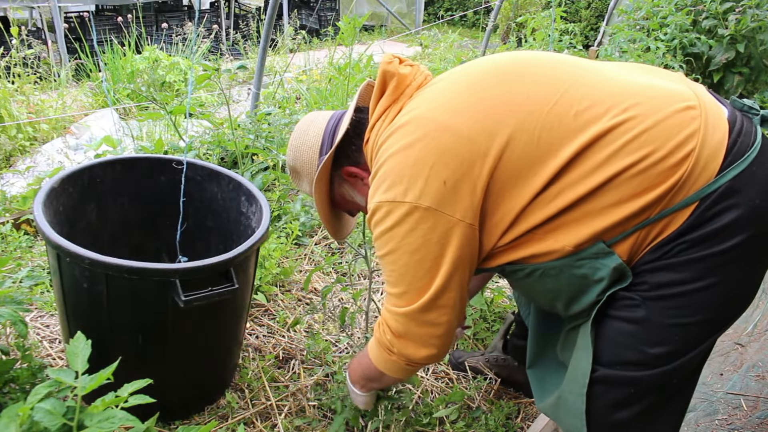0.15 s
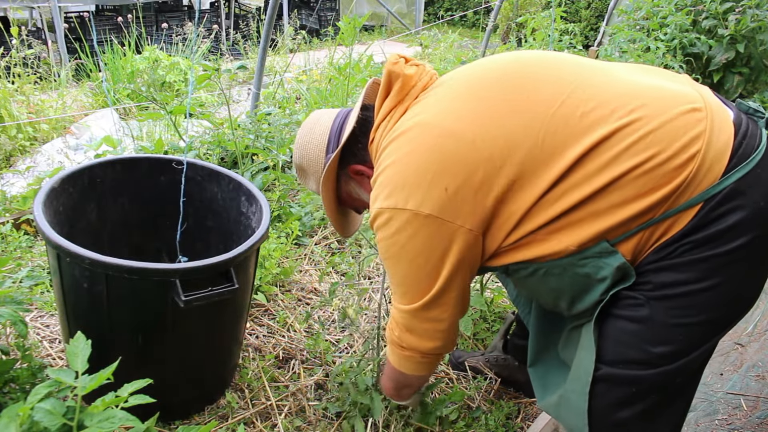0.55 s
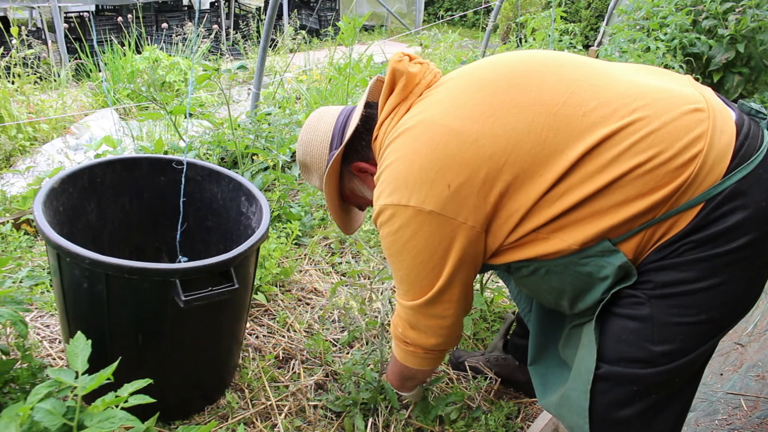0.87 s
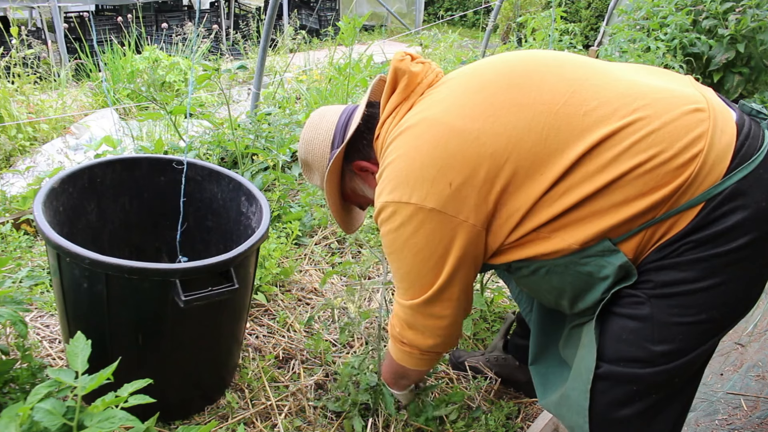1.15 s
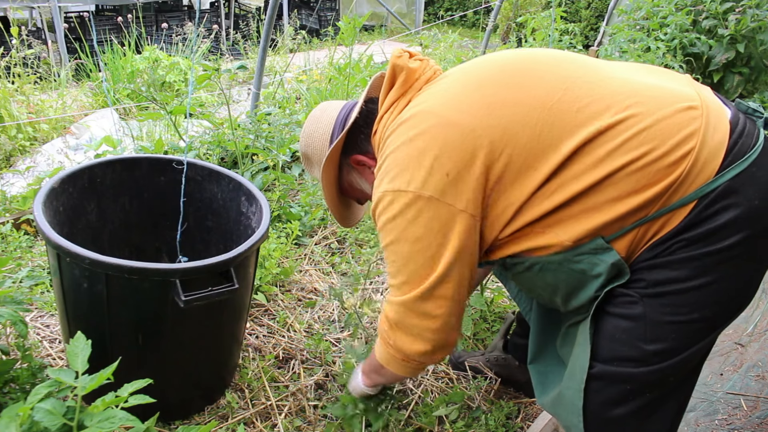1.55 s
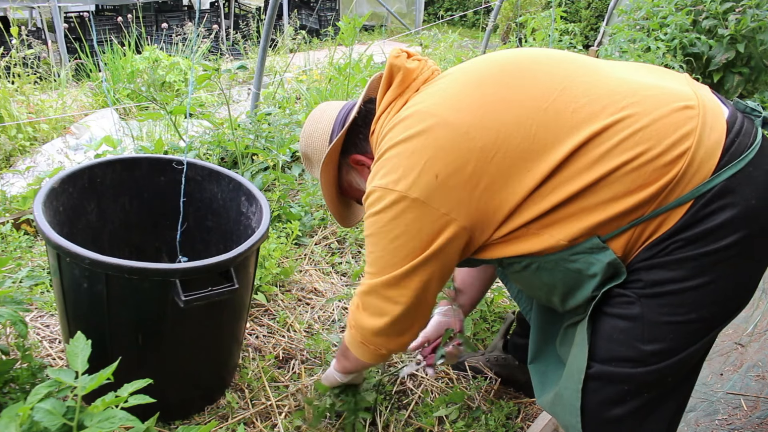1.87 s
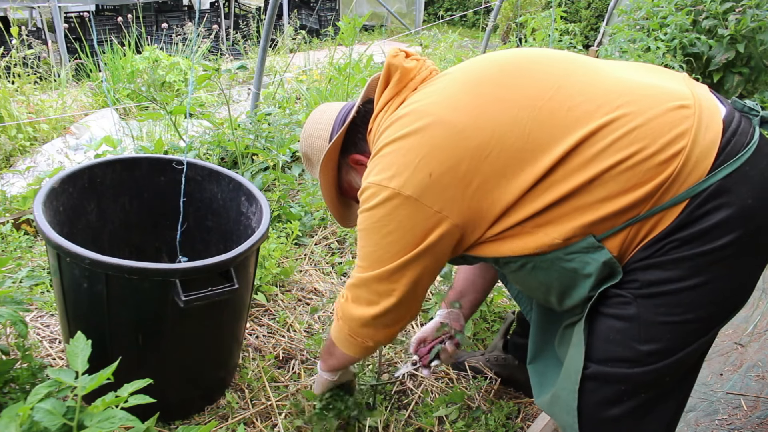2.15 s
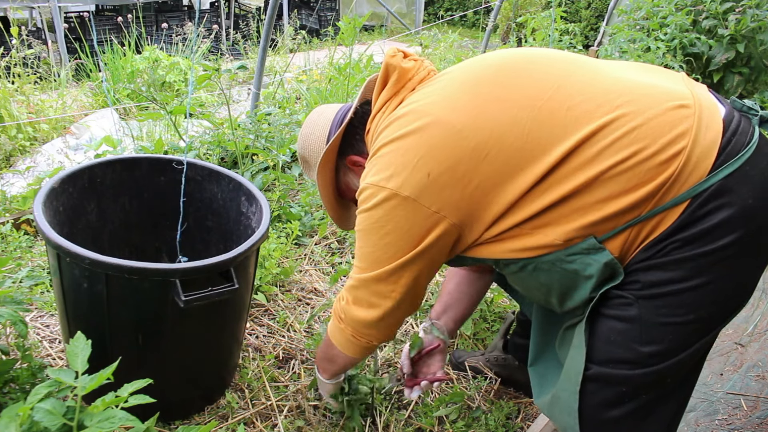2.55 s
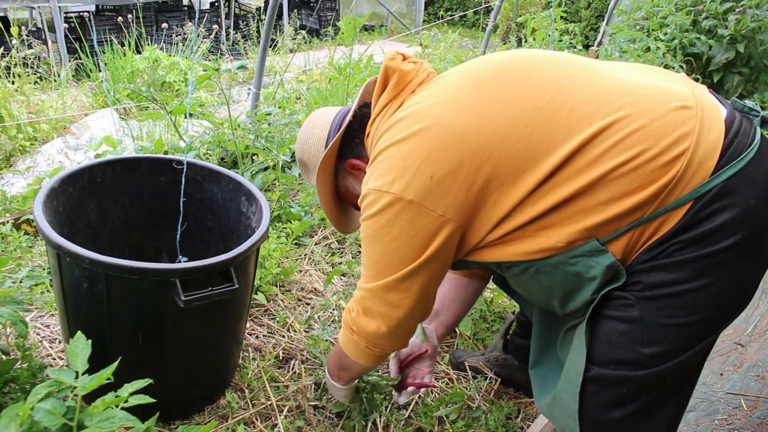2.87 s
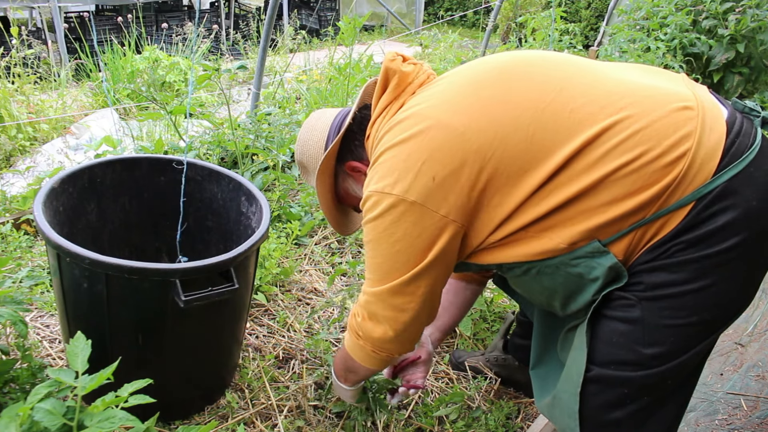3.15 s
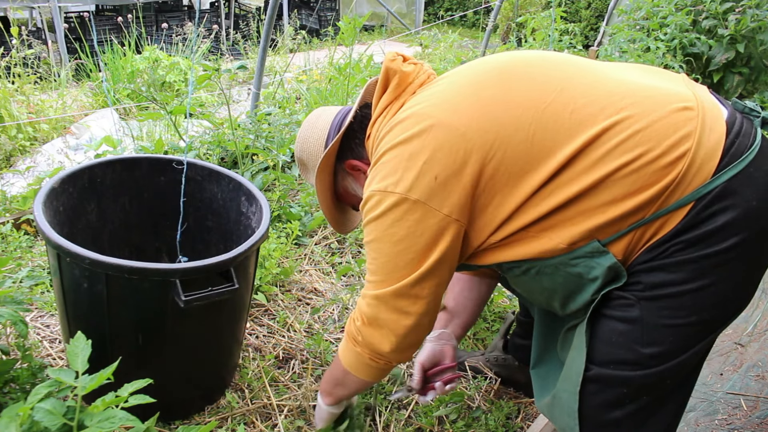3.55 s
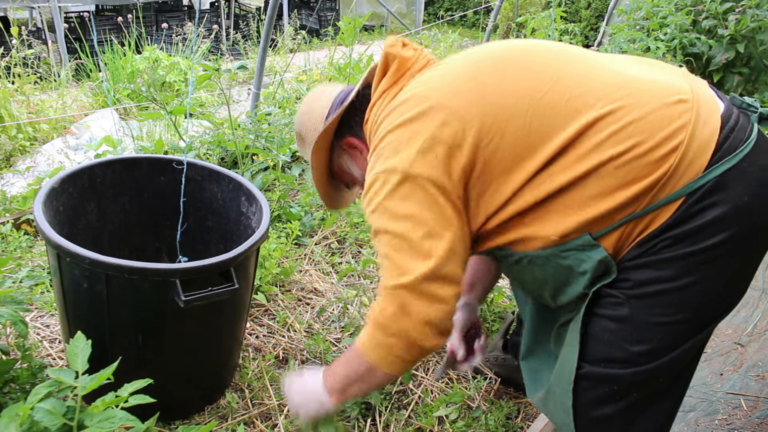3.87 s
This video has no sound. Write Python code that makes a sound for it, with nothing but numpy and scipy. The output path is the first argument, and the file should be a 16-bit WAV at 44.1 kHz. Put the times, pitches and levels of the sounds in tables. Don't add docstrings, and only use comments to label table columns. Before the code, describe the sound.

Two loud, crisp shear snips cut stems while leaves rustle and a nearby finch sings.

```python
import sys
import numpy as np
from scipy import signal
from scipy.fft import rfft, irfft
from scipy.io import wavfile
from scipy.ndimage import uniform_filter1d

SR = 44100
rng = np.random.default_rng(int(sys.argv[2]) if len(sys.argv) > 2 else 0)


def volts_from_decibels(level):
    exponent = np.asarray(level, float) / 20
    return 10 ** exponent


def waveform_to_disk(signal):
    frames = np.transpose(np.atleast_2d(signal))
    scaled = np.clip(frames, -1, 1) * 32767
    samples = np.round(scaled).astype(np.int16)
    wavfile.write(sys.argv[1], SR, samples)


N = 176400


def evened(x):
    return x / np.sqrt(np.mean(x ** 2) + 1e-20)


def smooth_noise(width, size=N):
    return evened(uniform_filter1d(rng.standard_normal(size), width))


def colour(x, points):
    point_hz, level_db = np.transpose(points)
    hz = np.fft.rfftfreq(x.shape[-1], 1 / SR)
    gain = volts_from_decibels(np.interp(np.log(hz + 1), np.log(point_hz), level_db))
    return evened(irfft(rfft(x) * gain, x.shape[-1]))


def add(mix, start_s, sound):
    part = mix[max(round(start_s * SR), 0):][:len(sound)]
    part += sound[:len(part)]


def resonate(x, hz, width_hz):
    turn = np.exp(2j * np.pi * np.cumsum(hz * np.ones(len(x))) / SR)
    pole = np.exp(-np.pi * width_hz / SR)
    return 2 * (turn * signal.lfilter([1 - pole], [1, -pole], x / turn)).real


def fuzz(noise, hz, width_hz):
    return evened(resonate(resonate(noise, hz, width_hz), hz, width_hz))


def ring(modes, phases):
    t = np.arange(3000) / SR
    out = np.zeros(len(t))
    for (hz, level_db, t60_s), phase in zip(modes, phases):
        rise_s = max(.00035, .8 / hz)
        decay_s = min(t60_s, .02 * max(1, 1000 / hz))
        swell = np.sin(np.pi / 2 * np.minimum(t / rise_s, 1)) ** 2
        out += swell * volts_from_decibels(level_db - 60 * t / decay_s) * np.sin(2 * np.pi * hz * t + phase)
    return out


def grains(size, per_s, spread_db):
    chance, strength, sign = rng.random((3, size))
    return (chance < per_s / SR) * volts_from_decibels(-spread_db * np.log(strength + 0.0034)) * np.sign(sign - .5)


def field(x, t60_s, echo_db):
    t = np.arange(SR // 2) / SR
    tail = rng.standard_normal(len(t)) * volts_from_decibels(-60 * t / t60_s) * (t > .004)
    return x + volts_from_decibels(echo_db) * signal.fftconvolve(x, tail / np.linalg.norm(tail))[:N]


def hiss(shape):
    # hz, level_db
    spectrum = [(25, -5), (150, -5.5), (400, -8), (5400, -15), (11000, -8.5), (15500, -8.5)]
    return volts_from_decibels(-55) * colour(rng.standard_normal(shape), spectrum)


def air():
    # hz, level_db
    spectrum = [(20, -14.5), (50, -3.5), (190, -9), (600, -8.5), (1600, -13), (4200, -14), (6500, -18.5),
                (12000, -23)]
    hz, _, z = signal.stft(colour(rng.standard_normal(N), spectrum), SR, nperseg=1024)
    across_hz = uniform_filter1d(rng.standard_normal(z.shape), 10, 0)
    patches = evened(uniform_filter1d(across_hz, 8, 1))
    z = z * volts_from_decibels(3.56 * patches * (hz[:, None] > 430))
    return volts_from_decibels(-54) * signal.istft(z, SR, nperseg=1024)[1][:N]


def camera():
    # hz, level_db
    click = [(3000, -7), (5500, 6.5), (9500, 9), (13000, 7), (16000, -18)]
    # hz, level_db, t60_s
    tick = [(464, -49.5, 0.068), (750, -43.5, 0.023), (970, -42.5, 0.0089)]
    burst_hz, burst_at_s, duty = 69.52, .0062, .4
    click_hz, click_db = 1025, -58
    frame_s, frames_per_tick, tick_at_s = .04, 2.25, .0072
    t = np.arange(N) / SR
    gate = abs(((t - burst_at_s) * burst_hz + .5) % 1 - .5) < duty / 2
    turns = t * click_hz + .1 * smooth_noise(9000)
    clicks = np.diff(np.floor(np.maximum.accumulate(turns)), prepend=0)
    clicks = clicks * gate * (1 + .2 * rng.standard_normal(N))
    out = volts_from_decibels(click_db) * colour(clicks, click)
    for k, draw in enumerate(rng.standard_normal((45, 4))):
        at_s = tick_at_s + frame_s * int(frames_per_tick * k)
        add(out, at_s, volts_from_decibels(0.5 * draw[3]) * ring(tick, .5 * draw))
    return out


def voice(curve, width_hz, pure, second_db=-40, beat_hz=0, beat=0):
    time_s, pitch_hz, level_db = np.transpose(curve)
    t = np.arange(N) / SR
    hz, noise = np.interp(t, time_s, pitch_hz), rng.standard_normal(N)
    tone = pure * np.sqrt(2) * np.sin(2 * np.pi * np.cumsum(hz) / SR)
    tone += (1 - pure) * fuzz(noise, hz, width_hz)
    tone += volts_from_decibels(second_db) * fuzz(noise, 2 * hz, 2 * width_hz)
    flutter = 1 + beat * np.sin(2 * np.pi * beat_hz * t)
    return tone * flutter * volts_from_decibels(np.interp(t, time_s, level_db, -140, -140))


def far_birds():
    # time_s, pitch_hz, level_db
    coo = [(0, 296, -61.5), (.27, 292, -61), (.33, 289, -88)]
    chatter = [(.05, 5030, -78), (.3, 4800, -63), (.65, 5040, -69), (2.8, 4630, -65)]
    blur = [(2.228, 3720, -51), (2.255, 3650, -50), (2.27, 3200, -54), (2.285, 2860, -45),
            (2.335, 2840, -54)]
    pipe_over = [(2.35, 1810, -61), (2.415, 1850, -54), (2.5, 1861, -54), (2.575, 1830, -62),
                 (2.625, 1830, -73)]
    pipe = [(2.385, 1051, -52), (2.46, 1061, -51), (2.495, 1046, -57), (2.575, 1040, -45.5),
            (2.625, 1051, -67), (2.745, 1001, -52), (2.82, 981, -63), (3.15, 1031, -69)]
    slur = [(3.32, 2320, -60), (3.36, 2130, -54), (3.42, 1755, -45.5), (3.5, 1720, -47.5), (3.6, 1550, -68)]
    whistle = [(3.615, 2103, -52), (3.635, 2100, -43.5), (3.68, 2077, -34.5), (3.705, 2089, -45.5),
               (3.74, 2087, -57), (3.8, 2094, -41), (3.84, 2069, -47.5), (3.865, 2064, -35.5),
               (3.93, 2070, -52.5)]
    out = voice(coo, 53, 0.24, second_db=-1.5)
    out += voice(chatter, 680, 0) + voice(blur, 290, 0.14)
    out += voice(pipe_over, 180, .1) + voice(pipe, 63, 0.25)
    out += voice(slur, 330, 0.13) + voice(whistle, 68, 0.68, beat_hz=126.2, beat=0.23)
    return field(out, 0.57, -7)


def rustle():
    # start_s, length_s, level_db, brightness (0 straw, 1 leaf)
    strokes = [(0.197, 0.074, -57.5, 0.3), (0.372, 0.13, -54, 0), (1.244, 0.038, -45, 0.4),
               (1.577, 0.09, -51, 0.54), (1.912, 0.25, -48.5, 0.42), (2.125, 0.056, -53, 0),
               (2.234, 0.2, -52, 0.2), (3.282, 0.043, -44, 0.86), (3.439, 0.15, -48.5, 0.8),
               (3.668, 0.28, -49.5, 0.41), (3.735, 0.052, -56.5, 1), (3.794, 0.049, -57.5, 0.2),
               (3.85, 0.07, -53, 1), (3.484, 0.04, -63, 0.86), (3.94, 0.12, -50.5, 0.4)]
    # hz, level_db
    straw = [(600, -4.5), (1500, 1.5), (3500, 7), (6000, -8), (12000, -37)]
    leaf = [(2000, 2), (7000, -5.5), (11500, -3), (15500, -1)]
    # start_s, peak_db, pitch_hz
    snaps = [(1.243, -28, 2000), (1.959, -31.5, 13000), (3.317, -16, 4700), (3.3258, -25, 6950),
             (3.522, -34, 3600), (3.877, -41, 12000), (1.846, -34.5, 410), (1.2866, -25, 8100),
             (1.2868, -29.5, 10400), (1.2905, -24, 7350), (1.502, -33, 3140), (2.4, -38, 5000),
             (1.424, -35.5, 1210), (1.658, -26.5, 1210), (0.726, -37, 1220), (3.972, -39, 540),
             (3, -35, 267)]
    straw_level, leaf_level = np.zeros(N), np.zeros(N)
    for start_s, length_s, level_db, bright in strokes:
        shape = volts_from_decibels(level_db) * np.hanning(round(length_s * SR)) ** 0.14
        add(straw_level, start_s, shape * np.sqrt(np.clip(1 - bright, 0, 1)))
        add(leaf_level, start_s, shape * np.sqrt(np.clip(bright, 0, 1)))
    out = straw_level * colour(grains(N, 4400, 2.1), straw)
    out += leaf_level * colour(grains(N, 6400, 0.62), leaf)
    out *= volts_from_decibels(2.73 * smooth_noise(400))
    t = np.arange(0, .012, 1 / SR)
    for start_s, peak_db, hz in snaps:
        decay = volts_from_decibels(peak_db - 60 * t / (0.0083 + 7.2 / hz))
        add(out, start_s, decay * np.minimum(t * hz / 2, 1) * np.sin(2 * np.pi * hz * t))
    return out


def note(length_s, from_hz, to_hz, level_db):
    u = np.linspace(0, 1, round(length_s * SR))
    if to_hz > from_hz:
        glide, fade_db = 1 - (1 - u) ** 2.27, 4.0
    else:
        glide, fade_db = u ** 1.315, 12.0
    hz = from_hz + (to_hz - from_hz) * glide
    swell = np.sin(np.pi * u) ** 0.37
    return volts_from_decibels(level_db - fade_db * u) * swell * np.sin(2 * np.pi * np.cumsum(hz) / SR)


def finch():
    # delay_s, length_s, from_hz, to_hz, level_db
    motif_a = [
        (-.016, 0.016, 4880, 4500, -4),
        (0, 0.0243, 3500, 4496, 1.5),
        (.043, 0.012, 3530, 4180, 0),
        (.056, .016, 4230, 3600, 5),
        (.072, 0.0227, 3350, 2300, 1.5),
        (.077, 0.0165, 3300, 2520, -3),
    ]
    motif_b = [
        (-.004, 0.0127, 4830, 4300, -4),
        (.004, 0.0145, 4280, 3160, 5),
        (.021, 0.022, 3330, 3390, 0),
        (.051, .034, 3300, 1883, 3.5),
    ]
    # start_s, level_db, pitch_factor, pace_factor
    times_a = [
        (0.729, -43, 0.96, 1.0),
        (0.943, -42, 0.96, 0.97),
        (1.141, -41.5, 0.96, 1),
        (1.333, -40, .97, 0.97),
        (1.53, -40, 0.93, 0.94),
    ]
    times_b = [
        (1.681, -42, 0.98, 0.97),
        (1.811, -41.5, 0.99, 0.93),
        (1.935, -42, .96, 1.0),
        (2.071, -43, 0.97, 1.0),
    ]
    # (the two at 3.18 and 3.236 s are a second, lower bird)
    single_notes = [(2.407, 0.02, 3350, 2800, -40), (3.18, 0.072, 1880, 2160, -50),
                    (3.236, 0.054, 2470, 2160, -41), (1.843, .009, 3700, 4150, -49),
                    (1.714, .009, 3600, 4050, -53), (2.112, .018, 3900, 3400, -47),
                    (2.138, .02, 3650, 3800, -48), (2.13, .014, 4100, 4700, -52),
                    (2.158, .02, 4700, 5100, -51), (2.361, .022, 3900, 4650, -52),
                    (1.592, .01, 3500, 4100, -44)]
    # time_s, pitch_hz, level_db
    buzz_high = [(2.385, 3870, -56), (2.425, 3860, -50.5), (2.465, 3890, -53), (2.53, 3940, -46.5),
                 (2.575, 4300, -50.5), (2.63, 4060, -52.5), (2.675, 3850, -57), (2.71, 3910, -51),
                 (2.82, 3930, -65)]
    buzz_low = [(2.39, 3300, -48), (2.43, 2800, -45.5), (2.5, 3070, -48.5), (2.56, 3430, -55)]
    droop = [(2.71, 3200, -57), (2.76, 2700, -54), (2.8, 2370, -51.5), (2.84, 2450, -63), (2.9, 3050, -59)]
    buzz_end = [(2.86, 3650, -57), (2.9, 3720, -46), (2.94, 3900, -55), (2.97, 3850, -72),
                (3.05, 3870, -78)]
    out = np.zeros(N)
    for motif, times in ((motif_a, times_a), (motif_b, times_b)):
        for start_s, call_db, factor, pace in times:
            for delay_s, length_s, from_hz, to_hz, note_db in motif:
                sound = note(pace * length_s, from_hz * factor, to_hz * factor, call_db + note_db)
                add(out, start_s + pace * delay_s, sound)
    for start_s, *settings in single_notes:
        add(out, start_s, note(*settings))
    out += voice(buzz_high, 370, 0.12) + voice(buzz_low, 1050, .1)
    out += voice(droop, 880, .05) + voice(buzz_end, 250, 0.26)
    echoes = field(out, .5, -1.7) - out
    shimmer = evened(uniform_filter1d(rng.standard_normal((2, N)), 60))
    return out * volts_from_decibels(1.45 * shimmer[0]) + echoes * volts_from_decibels(3.0 * shimmer[1])


def shears():
    # start_s, peak_db
    cut_a = [
        (1.2851, -3),
        (1.2864, -9),
        (1.2903, -15),
        (1.313, -28),
    ]
    cut_b = [
        (3.3206, 2),
        (3.326, -10),
        (3.330, -40),
        (3.340, -32),
    ]
    crunch = [
        (1.2525, -31),
        (3.2925, -23.5),
        (3.304, -17.5),
        (3.3115, -16.5),
        (3.3148, -13),
        (3.3745, -32),
        (3.462, -31),
    ]
    # hz, level_db, t60_s
    ring_a = [(679, -10, 0.015), (828, -9.5, .012), (1065, -2.5, 0.016), (1497, -3.5, .011),
              (1800, 7.5, 0.0097), (2570, 6.5, 0.0098), (3720, 3, 0.0087), (4090, 4, .01),
              (5040, 3.5, 0.0077), (6300, -5, 0.0049)]
    ring_b = [(390, -2.5, 0.031), (595, -6, 0.031), (1460, -25, 0.016), (1827, 11.5, 0.014),
              (2180, 23.5, 0.0079), (2570, -7.5, 0.0087), (3500, 0.5, 0.019), (4250, 4, 0.012),
              (6760, -11, 0.0051), (11300, -16, 0.0046)]
    fibre = [(1300, 8, 0.018), (2300, 9, 0.008), (3300, 13.5, 0.0086), (4300, 6.5, 0.0076)]
    # start_s, level_db, t60_s, centre_hz, width_hz
    debris = [
        (1.274, -34, 0.21, 2730, 3520),
        (1.286, -31.5, 0.19, 3300, 3460),
        (1.289, -31, 0.054, 4240, 500),
        (3.285, -40.5, 0.47, 3160, 1500),
        (3.319, -29, 0.18, 1860, 764),
        (3.322, -38.5, 0.17, 4700, 3720),
    ]
    out, t = np.zeros(N), np.arange(SR // 2) / SR
    for cracks, modes, push in ((cut_a, ring_a, -1), (cut_b, ring_b, 1), (crunch, fibre, -1)):
        for start_s, peak_db in cracks:
            blow = ring(modes, .5 * rng.uniform(-1.7, 1, 14))
            add(out, start_s, push * volts_from_decibels(peak_db) * blow / abs(blow).max())
    for start_s, level_db, t60_s, centre_hz, width_hz in debris:
        crackle = fuzz(grains(len(t), 9000, 0.6), centre_hz, width_hz)
        add(out, start_s, crackle * volts_from_decibels(level_db - 60 * t / t60_s))
    low_cut = signal.butter(4, 430, "high", fs=SR, output="sos")
    return field(signal.sosfilt(low_cut, out), 0.73, -28)


def scene():
    mono = air() + camera() + far_birds() + rustle() + finch() + shears()
    return np.array([mono, mono])


def low_pass(x):
    return signal.sosfilt(signal.butter(12, 16970, fs=SR, output="sos"), x)


def record(dry):
    clipped = np.clip(dry + hiss(dry.shape), -1, 1)
    edge = signal.firwin(401, 15800, window=("kaiser", 9), fs=SR)[None]
    mix = signal.oaconvolve(clipped, edge, "same") + 0.00028
    return low_pass(mix)


dry = scene()
out = record(dry)
waveform_to_disk(out)
```